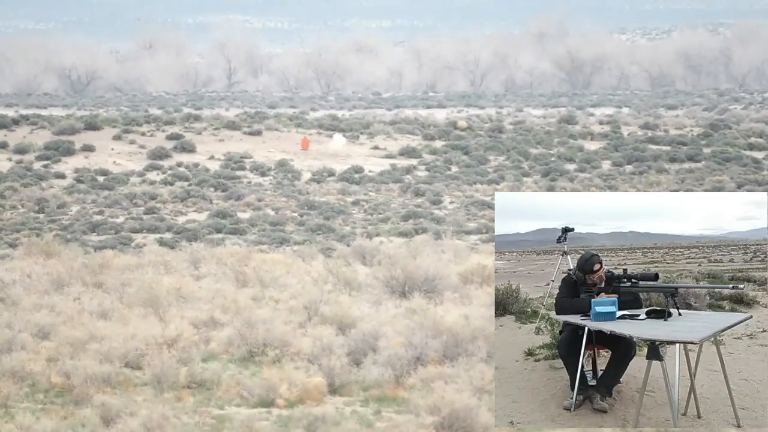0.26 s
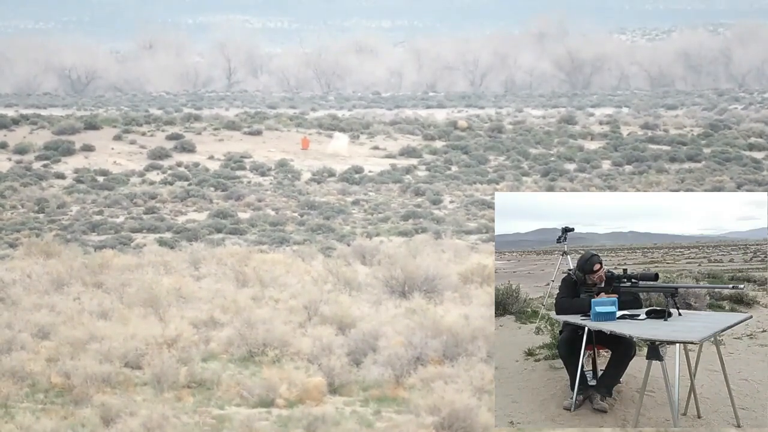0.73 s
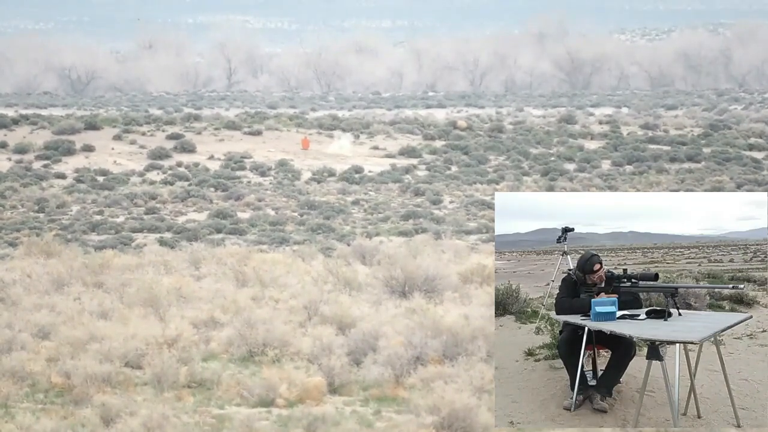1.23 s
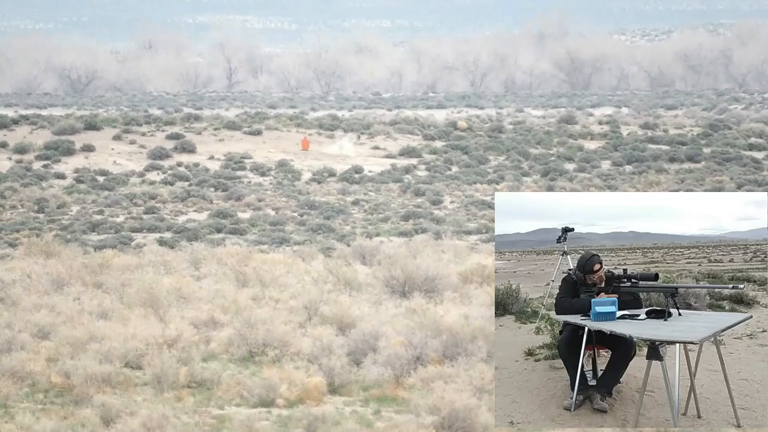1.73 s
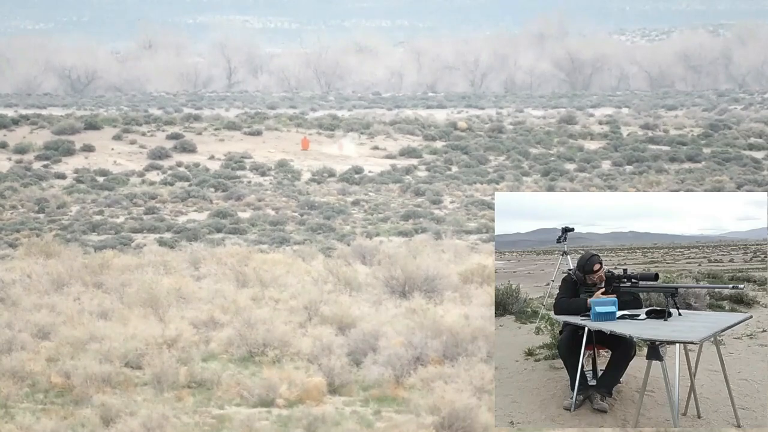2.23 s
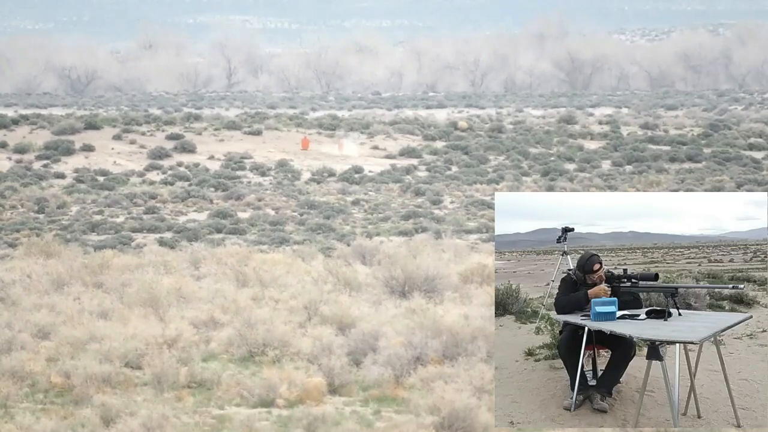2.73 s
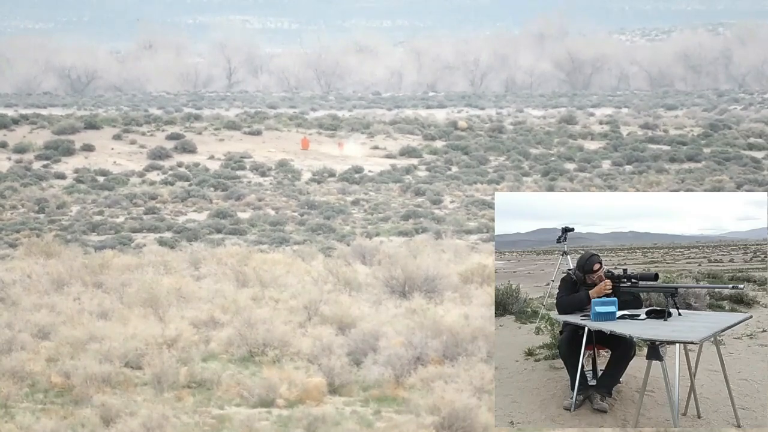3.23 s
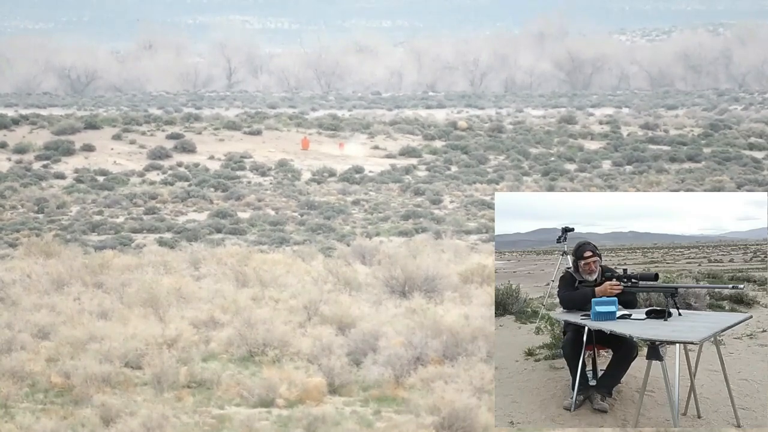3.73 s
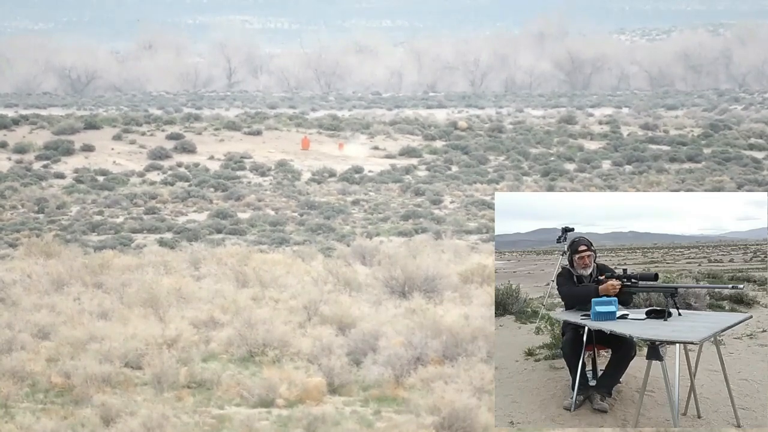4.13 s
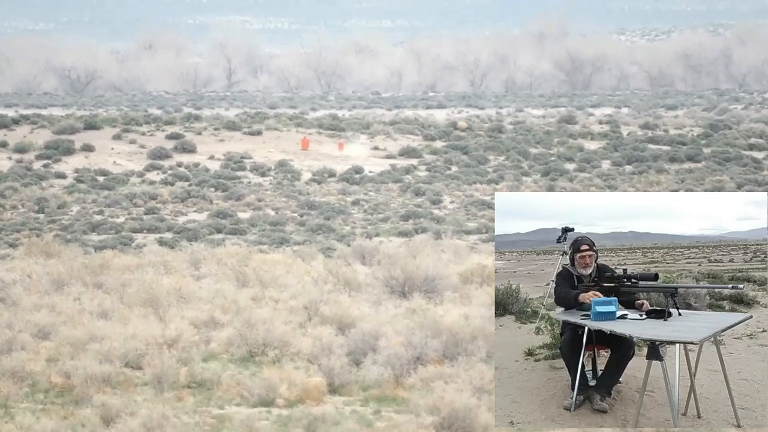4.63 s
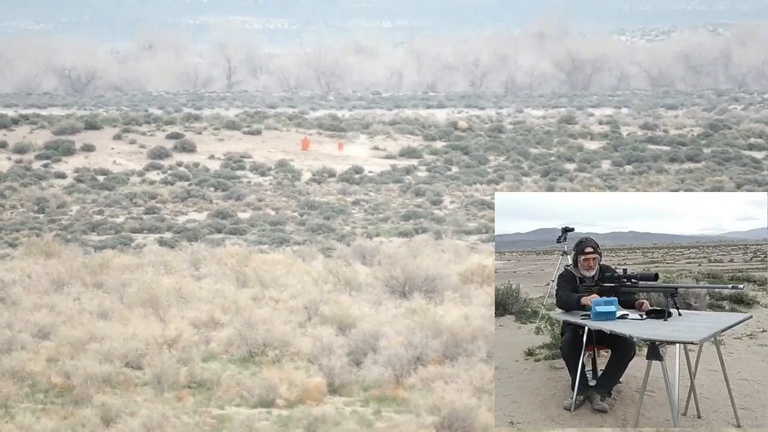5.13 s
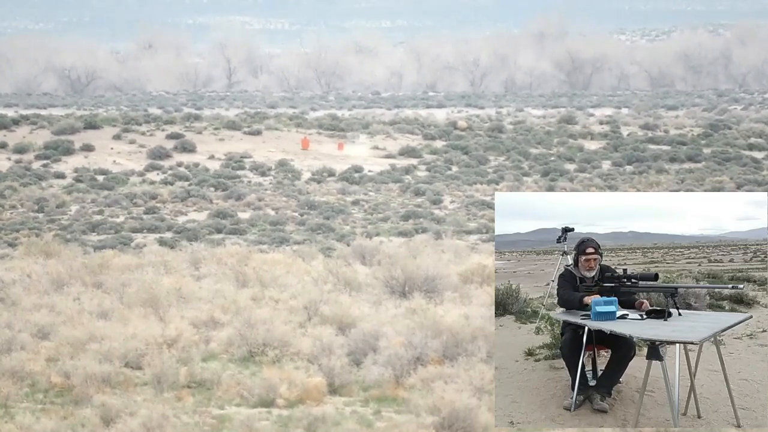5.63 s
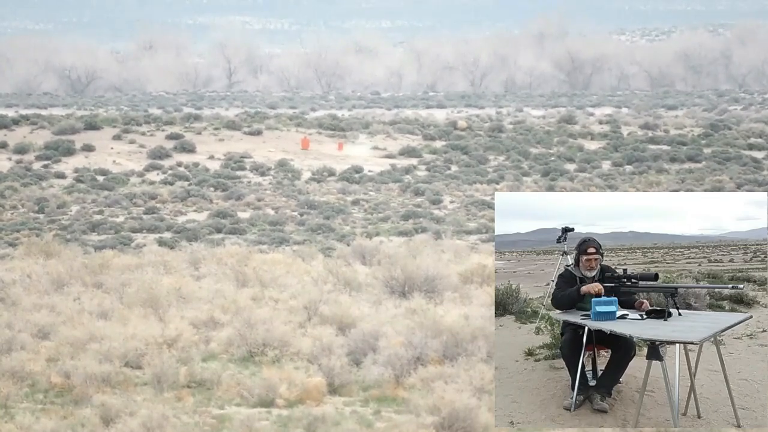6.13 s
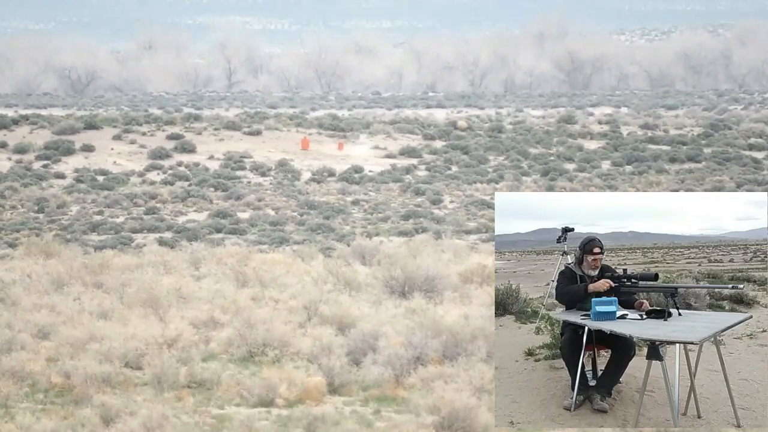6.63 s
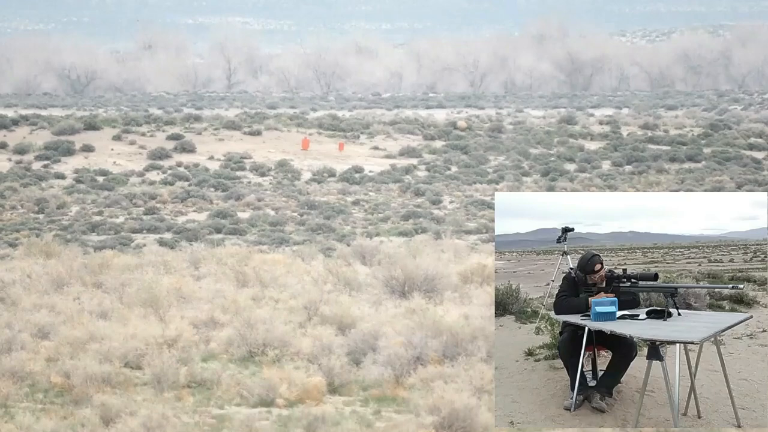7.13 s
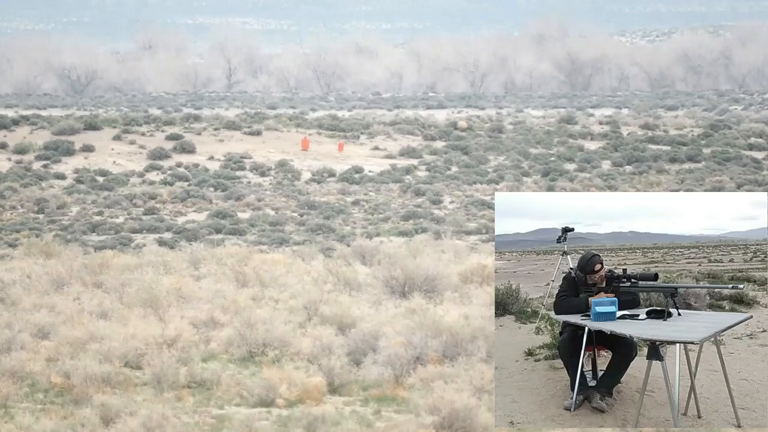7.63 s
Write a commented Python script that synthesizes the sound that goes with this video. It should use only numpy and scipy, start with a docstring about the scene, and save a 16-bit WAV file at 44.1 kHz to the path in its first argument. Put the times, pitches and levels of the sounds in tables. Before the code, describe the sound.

Sharp doubled metallic clacks of a hand-worked rifle bolt, an empty case knocking and rolling on a table, then one abrupt harsh noise burst.

```python
"""Outdoors, a rifle bolt is lifted, drawn back and closed on a folding table; a brass case bounces and rolls.
Blows excite decaying modes of steel, spring, brass, table top and frame; sliding is modulated noise.
Noise-like echoes follow the hits, a soft air hiss lies under all, and one rough burst starts and stops dead.
Everything but the burst is heard twice: a first copy under gain control, and a full copy 17 ms later;
the sum of all three is clipped and band-limited."""
import sys
import numpy as np
from scipy import signal
from scipy.fft import rfft, irfft
from scipy.io import wavfile
from scipy.ndimage import uniform_filter1d

SR = 44100
rng = np.random.default_rng(int(sys.argv[2]) if len(sys.argv) > 2 else 0)


def transcribe(u):
    """Save the signal u as a 16-bit wav file named by the first command-line argument.

    u: samples, shape (n,) or (channels, n), limited to [-1, 1]; the rate is SR.
    q: integer samples, one column per channel.
    """
    v = np.clip(np.atleast_2d(u).T, -1, 1)
    q = np.round(v * 32767).astype(np.int16)
    wavfile.write(sys.argv[1], SR, q)


N = 347243
LAG = 768  # samples between the two copies; the burst lasts as long


def gain_of(db):
    """Level law: 20 dB is a factor of ten in amplitude."""
    return 10 ** (np.asarray(db) / 20)


def evened(x):
    """Normalisation to an rms of 1."""
    return x / np.sqrt(np.mean(x ** 2) + 1e-20)


def peaked(x, db):
    """Normalisation to a peak level in dB."""
    return gain_of(db) * x / abs(x).max()


def add(mix, s, sound):
    """Superposition: the sound joins the mix at s seconds."""
    part = mix[round(s * SR):][:len(sound)]
    part += sound[:len(part)]


def faded_in(sound, size):
    """Finite contact time: the onset ramps up over size samples."""
    sound[:size] *= np.linspace(0, 1, size)
    return sound


def coloured(points, size):
    """Spectral shaping: white noise is filtered to the given spectrum, at an rms of 1."""
    f, db = np.transpose(points)
    hz = np.fft.rfftfreq(size, 1 / SR)
    spectrum_db = np.interp(np.log(hz + 1), np.log(f + 1), db)
    return evened(irfft(rfft(rng.standard_normal(size)) * gain_of(spectrum_db), size))


def ring(modes, scatter_db=2.0):
    """Modal superposition: one blow starts every mode, with a strength set by where it lands."""
    hz, db, t60 = np.array(modes)[:, :, None].transpose(1, 0, 2)
    t = np.arange(4096) / SR
    luck = rng.standard_normal((len(modes), 2))
    sign = np.sign(luck[:, :1])
    decay = gain_of(db + scatter_db * luck[:, 1:] - 60 * t / t60)
    return (sign * decay * np.sin(2 * np.pi * hz * t)).sum(0)


def scaled(modes, pitch_hz):
    """Similarity: mode factors become frequencies on a common pitch."""
    return [(pitch_hz * factor, db, t60) for factor, db, t60 in modes]


def tick(hz, t60):
    """Impulsive contact: a decaying noise crack, band-passed around hz."""
    crack = rng.standard_normal(1024) * gain_of(-60 * np.arange(1024) / SR / t60)
    return signal.sosfilt(signal.butter(2, [.72 * hz, 1.53 * hz], "band", fs=SR, output="sos"), crack)


def struck(events, modes, size):
    """Impact excitation: each blow, with a contact of size samples, rings one set of modes."""
    out = np.zeros(N)
    for s, db in events:
        add(out, s, peaked(faded_in(ring(modes), size), db))
    return out


def swing(hz, cycles):
    """Damped forced vibration: a few cycles swell and die while the contact lasts."""
    turns = np.arange(0, cycles, hz / SR)
    envelope = np.sin(np.pi * (turns / cycles) ** 0.77) ** 2
    return envelope * np.sin(2 * np.pi * (turns + rng.random()))


# chance within a run: share of the gap, dB, share of the pitch
UNEVEN, SPREAD_DB, SPREAD_PITCH = .25, 3.0, .06


def flurry(start, length, db, gap):
    """Random repetition: a run of at most 16 uneven blows, rows of (time [s], level [dB], pitch factor)."""
    luck = rng.standard_normal((16, 3))
    s = start + gap * (np.arange(len(luck)) + UNEVEN * luck[:, 0])
    rows = np.transpose([s, db + SPREAD_DB * luck[:, 1], 1 + SPREAD_PITCH * luck[:, 2]])
    return rows[s < start + length]


def rubbing(strokes, body_hz, grit_db):
    """Stick-slip friction: dense uneven slips drive a body band and a hiss above it."""
    out = np.zeros(N)
    size = SR + SR // 10
    body_band = [(.2, -30), (.5, -5), (1.001, -1.5), (2.2, -8), (4, -20.5), (8, -47)]
    hiss_band = [(2000, -25.0), (4000, -4.0), (6000, -4.0), (7500, -8), (16000, -17.5)]
    for s, length, turn, start_db, turn_db, end_db, treble_db in strokes:
        luck = rng.standard_normal(size)
        t = np.arange(0, length, 1 / SR)
        slips = gain_of(grit_db * evened(uniform_filter1d(luck, 100)))
        body = coloured([(factor * body_hz, db) for factor, db in body_band], size)
        hiss = coloured(hiss_band, size)
        rub = (evened(slips) * (body + gain_of(treble_db) * hiss))[:len(t)]
        level_db = np.interp(t, [0, turn, length], [start_db, turn_db, end_db])
        add(out, s, gain_of(level_db) * rub * signal.windows.tukey(len(t), .05))
    return out


# spectrum of the air hiss: (frequency [Hz], relative density [dB per Hz])
AIR_SPECTRUM = [(20, -34.5), (60, -28.5), (140, -21), (250, -9.5), (500, -1.5), (800, -2.5), (1200, -4),
                (2600, -8.5), (6000, -14.5), (12000, -17.5), (16000, -17)]
AIR_DB = -57.5  # rms level before the two copies are summed


def air():
    """Stationary noise: a steady soft hiss of fixed spectrum."""
    return gain_of(AIR_DB) * coloured(AIR_SPECTRUM, N)


# faint rustle of hand, sleeve and rolling case: (time [s], length [s], time to turning point [s],
# start level [dB], turning level [dB], end level [dB], hiss over body [dB])
RUSTLES = [(2.3, 0.57, 0.23, -72, -57.5, -54.5, -5), (2.96, 1.04, 0.14, -52.5, -53, -74, -7.5),
           (4.17, 0.31, 0.027, -41, -45, -63.5, -5), (4.95, 0.31, .11, -44, -55.5, -57.5, -13),
           (5.23, 0.81, 0.13, -63, -44, -62.5, -11.5), (6.1, 0.42, .1, -54.5, -62, -61, -4)]


def rustle():
    """Soft friction: faint rubbing noise follows each stroke's level."""
    return rubbing(RUSTLES, body_hz=1066, grit_db=2.0)


# hand on the stock: (time [s], length [s], time to turning point [s],
# start level [dB], turning level [dB], end level [dB], hiss over body [dB])
STOCK_SCRAPES = [(3.2, 0.069, 0.026, -50, -37, -42, -24), (6.314, 0.083, .002, -44, -45.5, -55, -13)]


def stock_scrapes():
    """Dry friction: the hand rubs the stock with a low body band."""
    return rubbing(STOCK_SCRAPES, body_hz=1270, grit_db=2.5)


# a dry joint squeaks briefly: (time [s], length [s], central frequency [Hz], level [dB])
DRY_JOINT = (3.618, .045, 1700, -50)


def squeak():
    """Frequency modulation: a short tone wavers at random about its centre."""
    out = np.zeros(N)
    s, length, hz, db = DRY_JOINT
    size = round(length * SR)
    waver = 1 + 0.033 * evened(uniform_filter1d(rng.standard_normal(size), 200))
    tone = np.sin(2 * np.pi * np.cumsum(hz * waver) / SR)
    add(out, s, gain_of(db) * tone * signal.windows.hann(size))
    return out


# dull thuds through stock and table: (time [s], level [dB], pitch [Hz])
THUD_BLOWS = [(2.492, -39, 384), (2.941, -29, 402), (4.044, -34.5, 203), (4.104, -25, 643),
              (4.123, -14, 691), (4.131, -20.5, 670), (5.355, -32, 450), (5.427, -39, 465),
              (5.47, -43, 452), (5.719, -30, 421), (5.764, -48, 403), (6.317, -18, 333), (6.333, -31, 340)]
# modes of stock and table frame: (factor on pitch [1], level [dB], t60 [s])
FRAME_MODES = [(.55, -17.5, .03), (1.001, 0.5, .024), (1.55, -3.5, 0.023), (2.4, -15.5, 0.016)]


def thuds():
    """Low-frequency resonance: soft blows swing the stock and table frame."""
    out = np.zeros(N)
    for s, db, hz in THUD_BLOWS:
        out += struck([(s, db)], scaled(FRAME_MODES, hz), size=100)
    return out


# taps on the brass case: (time [s], level [dB])
BRASS_TAPS = [(4.1594, -22.5), (4.9035, -41), (5.3542, -37), (5.3634, -38), (5.4735, -39), (5.505, -50),
              (6.0385, -19.5)]
# runs of light taps on the case: (time [s], length [s], mean level [dB], mean gap [s])
BRASS_SHIVERS = [(4.081, .022, -26.5, .005), (6.03, .015, -28, 0.0041)]
# modes of the brass case: (frequency [Hz], level [dB], t60 [s])
BRASS_MODES = [(10060, 6.5, 0.037), (9500, -3.5, .02), (10230, -26.5, .15)]


def brass_case():
    """Shell resonance: taps and shivers ring the high modes of the brass case."""
    shivers = [(s, db) for row in BRASS_SHIVERS for s, db, _ in flurry(*row)]
    return struck(BRASS_TAPS + shivers, BRASS_MODES, size=30)


# the case bounces to rest: (first landing time [s], level [dB], pitch [Hz], first flight [s],
# next flight over this one [1], loss per bounce [dB])
CASE_BOUNCES = [(5.12, -19, 1039, .0233, .655, 4), (5.4711, -8.5, 1078, .0315, .76, 3.5)]
BOUNCE_RISE = .02  # climb at each bounce, as a share of the first pitch


def bounces(s, db, hz, flight, shrink, loss_db, count=8):
    """Restitution: each flight is shorter and each landing softer than the last."""
    k = np.arange(count)
    landing_s = s + flight * (1 - shrink ** k) / (1 - shrink)  # geometric series of flights
    return list(zip(landing_s, db - loss_db * k, hz * (1 + BOUNCE_RISE * k)))


# the case and fingers knock the table top: (time [s], level [dB], pitch [Hz])
TABLE_KNOCKS = [(2.4908, -28, 1166), (2.692, -30.5, 1330), (2.731, -37, 1390), (3.0958, -37, 1010),
                (3.288, -40, 1070), (3.4513, -39, 1060), (3.834, -44, 1050), (4.0445, -18, 993),
                (4.2223, -28, 1050), (4.2853, -37, 917), (4.348, -32, 1060), (4.3972, -34.5, 1050),
                (4.4243, -35.5, 1104), (4.9024, -8, 1142), (4.934, -21.5, 1275), (4.9907, -21, 1190),
                (5.2542, -36, 1170), (5.2885, -24, 1320), (5.3548, -0.5, 1253), (5.3617, -8, 1320),
                (5.3671, -11.5, 1090), (5.4035, -25, 1010), (5.4265, -6.5, 1034), (5.4564, -22, 1080),
                (5.474, -9.5, 1094), (5.7059, -24.5, 936), (5.721, -16, 1547), (5.748, -28, 1220),
                (5.7625, -24.5, 940), (5.8543, -37.5, 1096), (6.0121, -34.5, 970), (6.0417, -25.5, 1030),
                (6.0647, -24, 1076), (6.3774, -38, 1052)]
# the case rolls and taps unevenly: (time [s], length [s], mean level [dB], mean gap [s], mean pitch [Hz])
CASE_ROLLS = [(4.91, .035, -24, 0.0076, 1230), (5.327, .02, -30, 0.0078, 1100),
              (5.009, .032, -35, .008, 1220), (5.15, .038, -33, 0.0044, 1130),
              (6.046, .03, -36.5, .006, 1050), (5.768, .024, -31, .007, 960)]
# after-ring of the table top: (factor on pitch [1], level [dB], t60 [s])
TOP_MODES = [(0.452, -13.5, 0.033), (0.881, -0.5, 0.043), (1.2, 0.5, .035), (1.65, 2, .02),
             (2.4, -9, 0.013)]
TICK_DB, TICK_SLOPE = -36, 0.51  # tick level for a 0 dB knock; its growth in dB per dB of knock


def table():
    """Plate vibration: the top is pushed at its pitch and in a higher and a lower shape, then rings."""
    out = np.zeros(N)
    rolls = [(s, db, hz * factor) for *row, hz in CASE_ROLLS for s, db, factor in flurry(*row)]
    landings = [hit for row in CASE_BOUNCES for hit in bounces(*row)]
    for s, db, hz in TABLE_KNOCKS + landings + rolls:
        add(out, s - .9 / hz, gain_of(db + 1.0) * swing(hz, cycles=3.87))
        # harder blows are brighter: the higher shape grows faster than the lower
        add(out, s - .5 / hz, gain_of(1.36 * db - 3.5) * swing(1.7 * hz, cycles=3.4))
        add(out, s - 0.49 / hz, gain_of(0.92 * db - 17.5) * swing(.62 * hz, cycles=3.4))
        after_ring = faded_in(ring(scaled(TOP_MODES, hz)), 60)
        add(out, s, peaked(after_ring, db - 7.0))
        add(out, s, peaked(tick(3000, 0.019), TICK_DB + TICK_SLOPE * db))
    return out


# a spring is plucked as the bolt comes back, then buzzes:
# (time [s], length [s], mean level [dB], mean gap [s])
SPRING_PLUCKS = [(4.043, .003, -7.5, .0012), (4.064, .037, -35, 0.0052)]
# modes of the spring: (frequency [Hz], level [dB], t60 [s])
SPRING_MODES = [(8720, 0.5, 0.029), (8700, -15.5, .02), (11660, -4.5, 0.045), (12240, -3.5, 0.013)]


def spring():
    """Free vibration: a run of plucks rings the high modes of the spring."""
    plucks = [(s, db) for row in SPRING_PLUCKS for s, db, _ in flurry(*row)]
    return struck(plucks, SPRING_MODES, size=60)


# bolt in its track: (time [s], length [s], time to turning point [s],
# start level [dB], turning level [dB], end level [dB], hiss over body [dB])
BOLT_SLIDES = [(2.913, .062, .028, -27.5, -29.5, -50, -10), (4.045, 0.053, .012, -18, -31.5, -33, -6.5),
               (4.1, .08, .03, -41.5, -28, -46, -14)]


def bolt_slides():
    """Sliding friction: the bolt rubs along its track with coarse slips."""
    return rubbing(BOLT_SLIDES, body_hz=1850, grit_db=3.0)


# hard bright clacks: steel parts of the action, and the bright edge of sharp knocks on the table:
# (time [s], level [dB], centre of colour [Hz], treble tick over body [dB])
HARD_CLACKS = [(2.691, -31.5, 5400, -4), (2.728, -33, 5400, -20.5), (2.7343, -33.5, 2143, -12),
               (2.9136, -21.5, 1800, -12), (2.916, -14, 3980, -7.5), (2.9197, -3, 4500, -9),
               (2.9229, -5.5, 2200, -19), (2.9313, 0.5, 1845, -12), (2.9369, -4.5, 2850, -10),
               (2.9406, 6.5, 2100, -9.5), (2.9447, -8.5, 1960, -15), (3.3902, -36, 3180, -26),
               (3.7006, -45.5, 5026, -2), (3.752, -48.5, 5484, -3), (3.8225, -36.5, 2907, -20),
               (3.8982, -39, 2890, -13.5), (4.0402, -28, 3000, -21), (4.043, 1, 3000, -10),
               (4.046, 1, 3260, -9), (4.1022, -1.5, 3120, -13), (4.1235, -2, 2500, -12),
               (4.1298, -4.5, 2010, -12), (4.1594, -1.5, 3310, -11), (4.6107, -44.5, 2994, -10),
               (4.7684, -44.5, 2500, -11), (4.9024, -31, 2690, -11.5), (4.934, -35.5, 2800, -10),
               (5.354, -15, 4160, -10.5), (5.427, -36.5, 4800, -12), (5.4734, -34, 3470, -10),
               (5.7194, -34.5, 3500, -12), (5.875, -36.5, 2800, -17), (6.1742, -38, 3200, -13),
               (6.3174, -23, 2113, -26), (6.454, -37.5, 2850, -18)]
# modes shared by the hard clacks: (frequency [Hz], level [dB], t60 [s])
CLACK_MODES = [(700, -12, 0.02005), (1054, -3, 0.016), (1518, -3, 0.019), (1874, -4.5, 0.019),
               (2205, -6, 0.02), (2524, -4.5, .015), (3068, 0.5, 0.0098), (3220, -10.5, 0.015),
               (4300, -7, 0.01), (5027, -1.5, 0.014), (5680, -1.5, .015), (6500, -13, .01)]
CHATTER_MS = 1.4  # time constant


def hard_clacks():
    """Modal excitation: one blow and a few ms of chatter ring the hard bright modes near its colour."""
    out = np.zeros(N)
    for s, db, colour_hz, treble_db in HARD_CLACKS:
        modes = []
        for hz, mode_db, t60 in CLACK_MODES:
            octaves_away = np.log2(hz / colour_hz)
            modes.append((hz, mode_db - 14.9 * octaves_away ** 2, t60))
        age = np.arange(512) / SR / (CHATTER_MS / 1000)
        chatter = 0.095 * rng.standard_normal(512) * np.exp(-age)
        chatter[0] = 1  # the blow itself
        clack = faded_in(signal.fftconvolve(chatter, ring(modes)), 24)
        add(out, s, peaked(clack, db))
        add(out, s, peaked(tick(colour_hz, 0.016), db - 8))
        add(out, s, peaked(tick(8000, .011), db + treble_db))
    return out


def ground(x):
    """Scattering: echoes decay quickly off the table and ground, slowly off the brush."""
    t = np.arange(SR // 2) / SR
    near = coloured([(100, -12.5), (1000, 1.5), (16000, -6)], len(t))
    near *= gain_of(10.0 - 60 * t / 0.027)
    far = coloured([(100, -9.5), (1000, -1), (4000, 0), (10000, 3.5), (16000, 2.5)], len(t))
    far *= gain_of(-21 - 60 * t / 0.54)
    echoes = (near + far) * (t > .002) / np.sqrt(SR)
    return signal.fftconvolve(x, echoes)[:N]


def scene():
    """Superposition: hits and slides with their echoes, over rustle and air."""
    hits = thuds() + squeak() + stock_scrapes() + brass_case() + table() + spring() + bolt_slides()
    hits += hard_clacks()
    # small parts radiate no bass
    hits = signal.sosfilt(signal.butter(3, 250, "high", fs=SR, output="sos"), hits)
    return (air() + rustle() + hits + ground(hits))[None]


# spectrum of the burst: (frequency [Hz], relative density [dB per Hz])
BURST_SPECTRUM = [(35, -56), (60, -40), (346, -12), (680, -28), (2090, -1), (2400, -6), (2760, -3.5),
                  (4100, -11), (4500, -9.5), (6250, -16), (7350, -32.5), (9070, -31), (15900, -59)]
BURST_S, BURST_DB = 6.734, -11  # start in s, rms level in dB before its edges are tapered


def burst():
    """Gated noise: a flat rough burst with abrupt edges, then a faint decaying wash of the same colour."""
    out = np.zeros(N)
    rough = coloured(BURST_SPECTRUM, LAG) * signal.windows.tukey(LAG, .04)
    add(out, BURST_S, gain_of(BURST_DB) * rough)
    t = np.arange(SR // 4) / SR
    wash_db = BURST_DB - 36 - 60 * t / 0.44
    add(out, BURST_S + LAG / SR, gain_of(wash_db) * coloured(BURST_SPECTRUM, len(t)))
    return out


EDGE_HZ = 16000  # upper band limit


def record(dry):
    """Compression and overload: a gain-controlled early copy joins the full one; the sum clips."""
    power_db = 10 * np.log10(abs(uniform_filter1d(dry[0] ** 2, 300)) + 1e-12)
    fall = np.arange(N) * 60. / SR  # slow recovery, 60 dB a second
    held_db = np.maximum.accumulate(power_db + fall) - fall
    over_db = np.maximum(held_db + 58.5, 0)  # excess over the threshold of -58.5 dB
    controlled = dry / gain_of(0.27 * uniform_filter1d(over_db, 100))
    first = np.roll(controlled, -LAG, axis=1)
    both = np.clip(dry + first + burst(), -.97, .97)
    low_pass = signal.firwin(255, EDGE_HZ, window=("kaiser", 8), fs=SR)
    return signal.oaconvolve(both, low_pass[None], "same")


dry = scene()
out = record(dry)
transcribe(out)
```